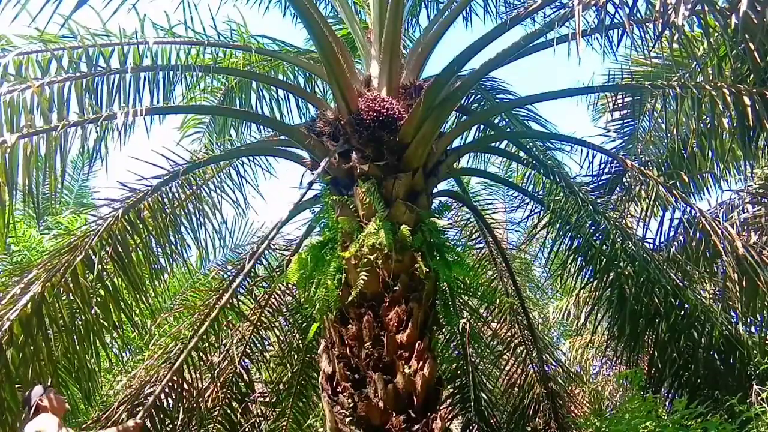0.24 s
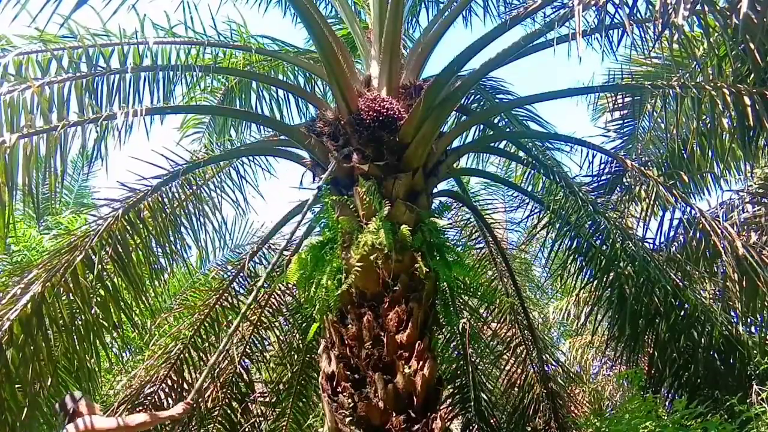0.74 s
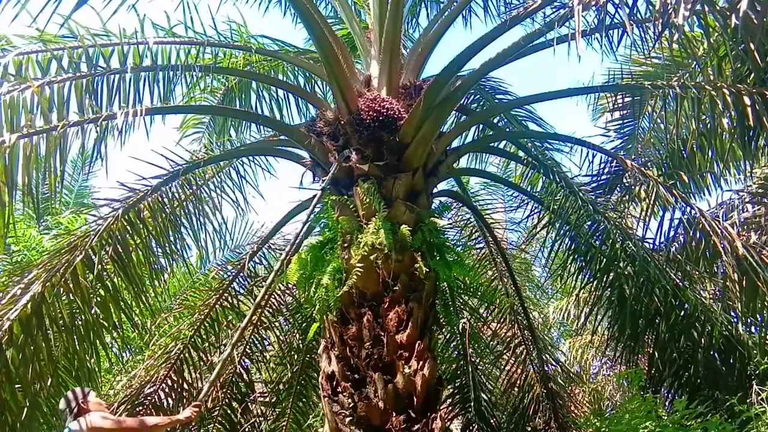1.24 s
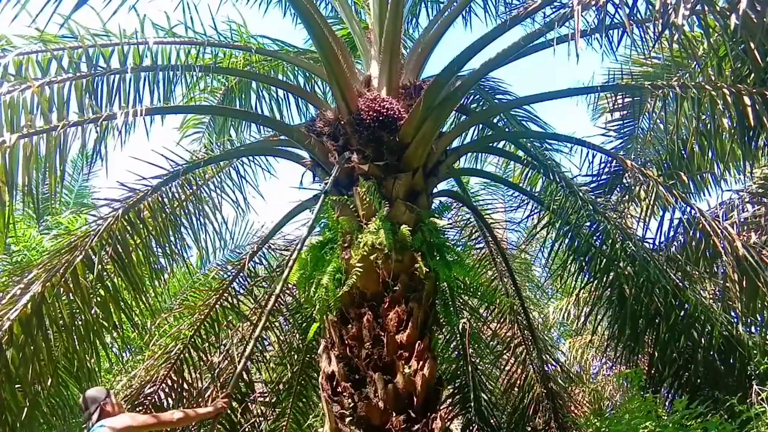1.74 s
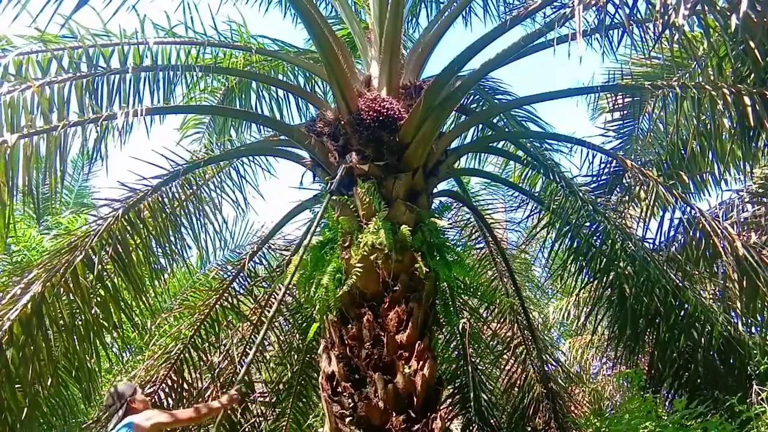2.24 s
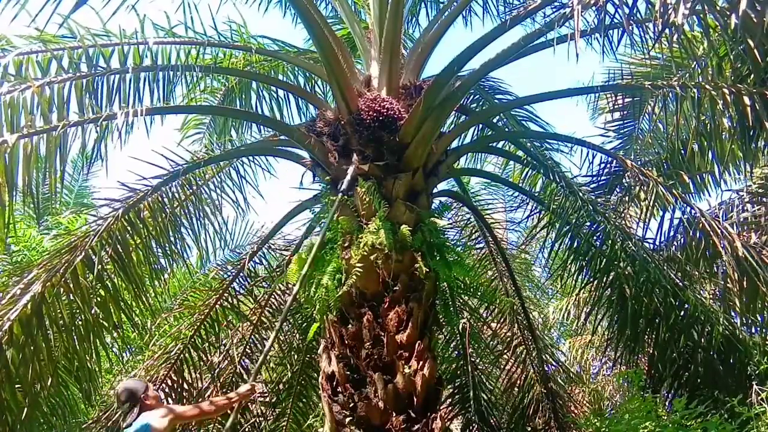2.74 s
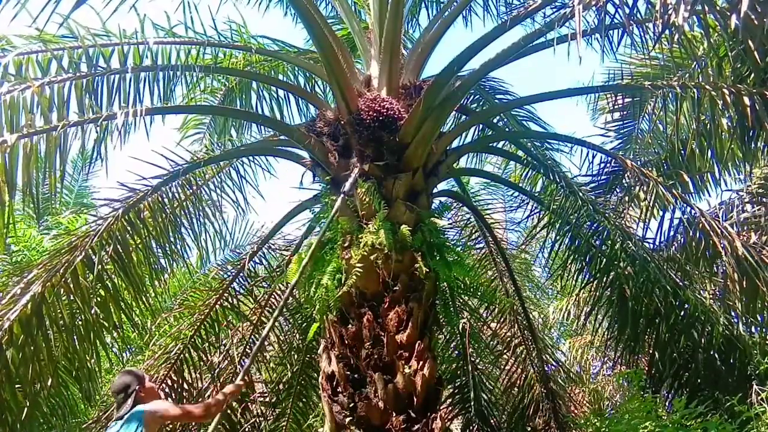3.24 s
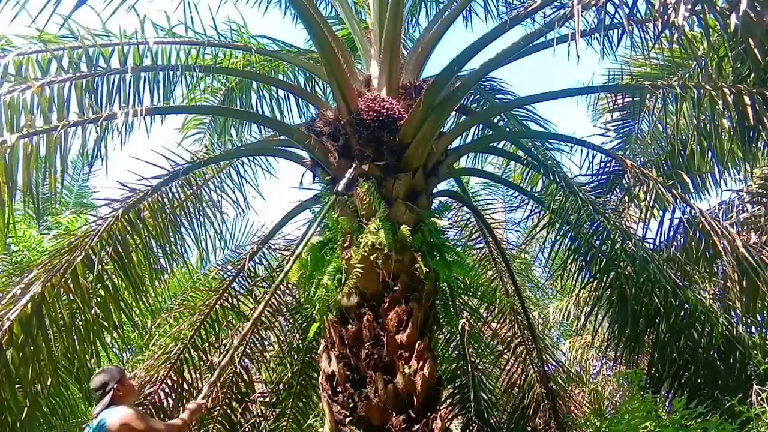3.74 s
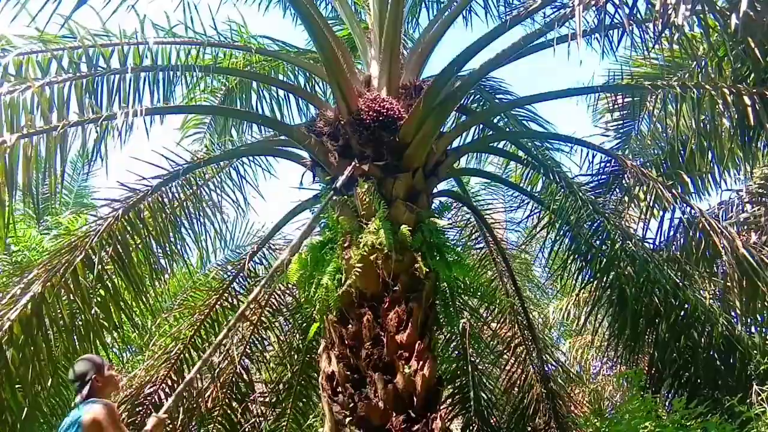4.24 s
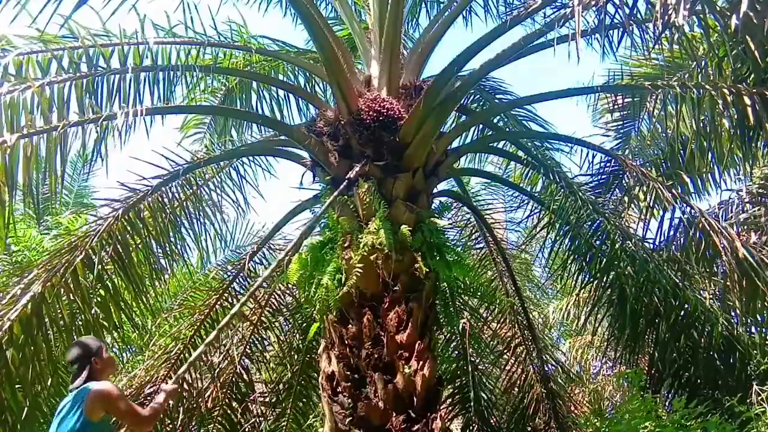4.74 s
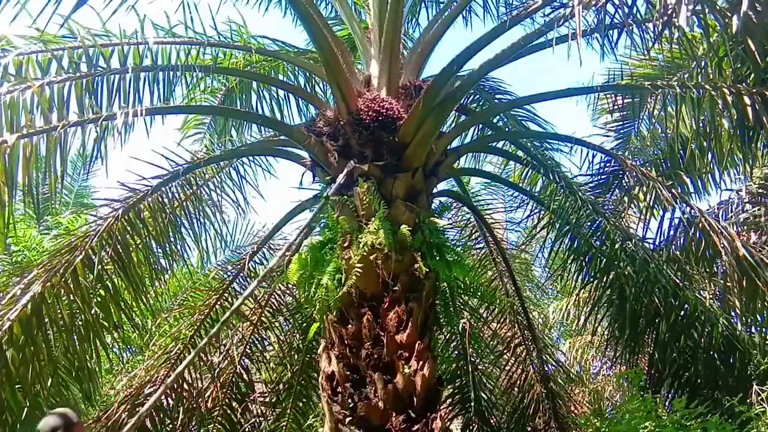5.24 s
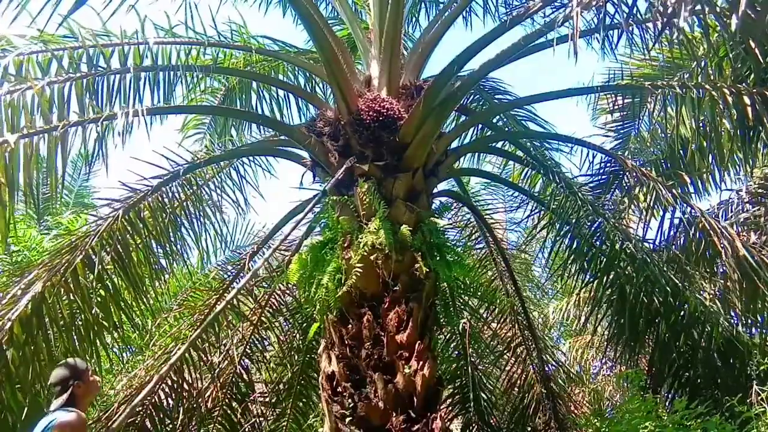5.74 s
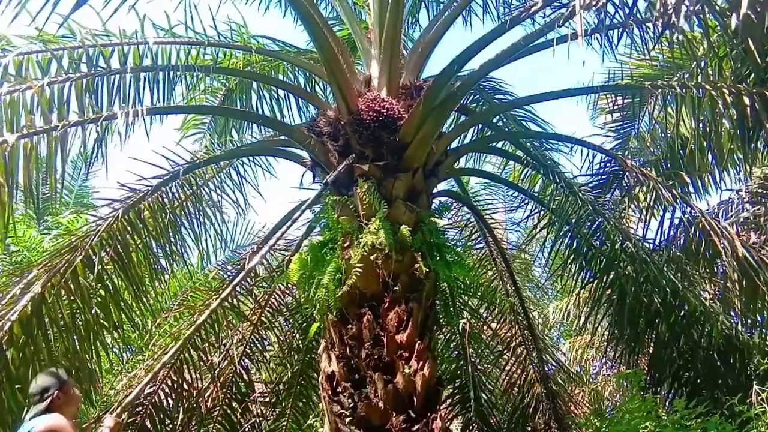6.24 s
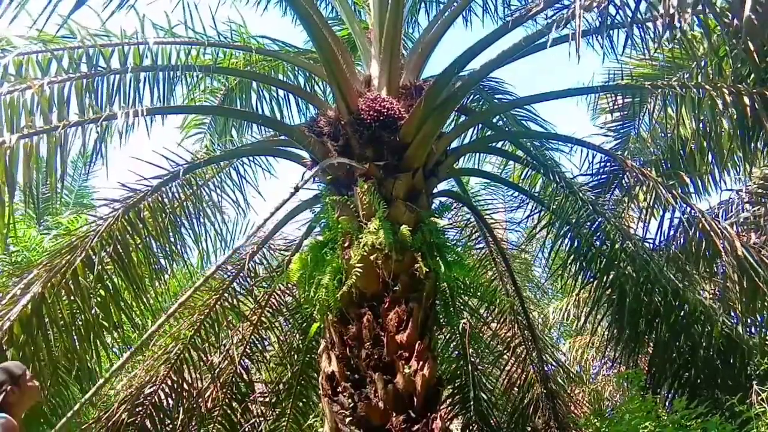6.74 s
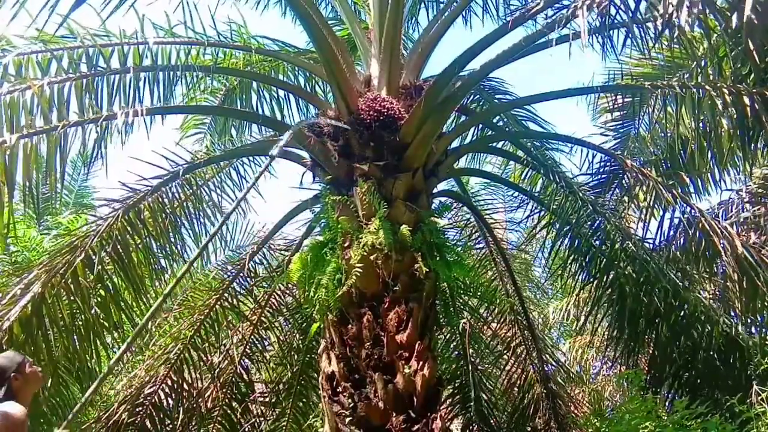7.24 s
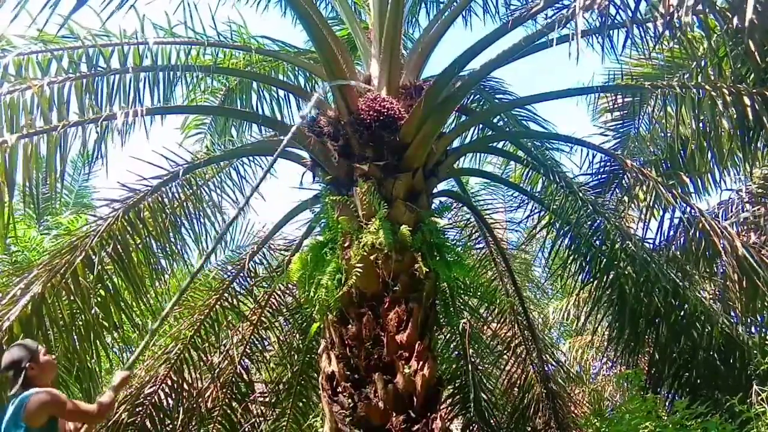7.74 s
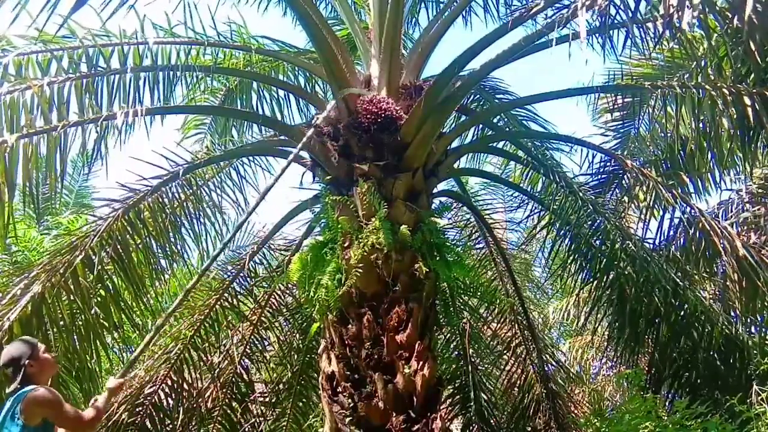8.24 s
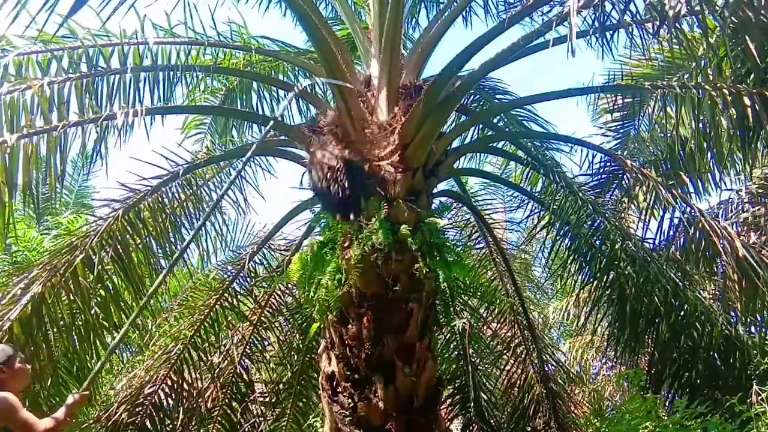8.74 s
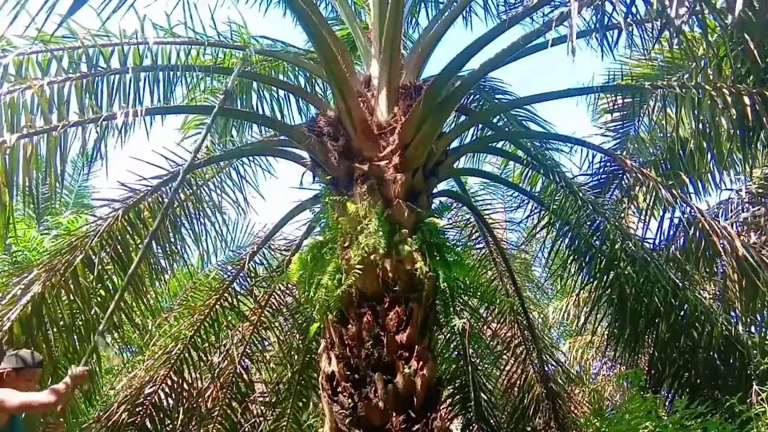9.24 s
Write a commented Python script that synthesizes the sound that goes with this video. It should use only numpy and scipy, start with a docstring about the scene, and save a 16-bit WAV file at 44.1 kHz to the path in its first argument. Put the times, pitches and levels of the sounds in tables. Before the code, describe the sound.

A blade on a long pole hacks into a palm crown with cracking blows, rustling fronds and cicada hiss, ending in a heavy low thud.

```python
"""Harvesting an oil palm with a sickle on a pole

A sickle on a long hollow pole is hooked into the crown and jerked again and again: blows are noise cracks,
blurred knocks and steel modes; rustle, scrape and creak are filtered grains; dull thumps are low swings.
A few thin tones squeal, and at the end the fruit bunch drops and thuds on the ground in short, damped swings.
Cicadas hiss in the plantation over a low bed of moving air. One microphone feeds both channels."""
import sys
import numpy as np
from scipy import signal
from scipy.fft import rfft, irfft, next_fast_len
from scipy.io import wavfile
from scipy.ndimage import uniform_filter1d, map_coordinates

SR = 44100
rng = np.random.default_rng(int(sys.argv[2]) if len(sys.argv) > 2 else 0)


def unload_wav(signal):
    """Save mono or channel-first audio to the path in sys.argv[1] as 16-bit WAV at rate SR, clipped to [-1, 1]."""
    wavfile.write(
        sys.argv[1],
        SR,
        np.round(np.clip(np.atleast_2d(signal).T, -1, 1) * 32767).astype(np.int16),
    )


N = 418051

# Colour of dry leaflets and of cracking fibre. Each row: frequency in Hz, relative level in dB per Hz.
LEAFLET_COLOUR = [(880, -21.5), (1500, -12), (1860, -15.5), (2930, -6.5), (3640, -5), (5840, -4),
                  (7930, 0.5), (10100, -8), (14900, -20), (15800, -5)]
# Modes of blade and pole. Each row: frequency in Hz, relative level in dB, time to fall 60 dB in seconds.
STEEL_MODES = [(2050, -6, 0.07), (2715, -7, 0.16), (3480, -10, 0.15), (4050, -5, 0.14), (4900, -9, 0.16),
               (5960, -7, 0.18), (6520, -6, 0.15), (7300, -3, 0.1), (7950, -2, 0.15)]
# Resonances of a scraped or knocked stalk. Each row: centre in Hz, width in Hz, relative level in dB.
STALK_WOOD = [(768, 376, -2.5), (1098, 306, 0.5), (1411, 372, -1), (1780, 260, -0.5), (2052, 297, -3.5),
              (2800, 220, -8.5)]
# The crown stirring between jerks. Each row: time in seconds, rustle level in dB, scrape level in dB.
CROWN_STIR = [(0, -36.5, -43), (.1, -31.5, -50), (.2, -35, -75), (.62, -39.5, -72), (.8, -44.5, -73),
              (.84, -38.5, -80), (1.3, -48.5, -57.5), (1.8, -48, -63), (2.45, -55, -52), (2.95, -75, -61),
              (3.4, -66, -64), (3.8, -51.5, -65), (4.7, -45.5, -67.5), (5.5, -46, -54), (6.1, -47.5, -57),
              (7.0, -43, -52.5), (7.5, -53, -59.5), (8.1, -33, -44), (8.9, -51, -61), (9.48, -27, -35)]


def amp(db):
    """Decibels to a linear factor."""
    return 10 ** (np.asarray(db) / 20)


def unit(x):
    """x brought to an RMS of 1."""
    return x / np.sqrt(np.mean(x ** 2) + 1e-20)


def along(points, hz):
    """Read a curve of (Hz, value) points on a log frequency axis."""
    f, v = np.transpose(points)
    return np.interp(np.log(hz + 1), np.log(f + 1), v)


def curves(rows):
    """One value per sample for each column after the time."""
    s, *cols = np.transpose(rows)
    return [np.interp(np.arange(N) / SR, s, c) for c in cols]


def wobble(rate):
    """A smooth random curve with rate knots a second."""
    knots = rng.standard_normal(int(N * rate / SR) + 4)
    return map_coordinates(knots, [np.arange(N) * rate / SR])


def filtered(x, response):
    """x shaped by a complex response of frequency."""
    m = next_fast_len(x.shape[-1] + SR // 4)
    spectrum = rfft(x, m) * response(np.fft.rfftfreq(m, 1 / SR))
    return irfft(spectrum, m)[..., :x.shape[-1]]


def coloured(x, points):
    """x shaped by a curve of (Hz, dB) points."""
    return filtered(x, lambda hz: amp(along(points, hz)))


def resonant(modes):
    """Causal response of (Hz, width in Hz, dB) resonances with alternating signs."""
    def response(f):
        return sum((-1) ** k * amp(db) * 1j * f * w / (c * c - f * f + 1j * f * w)
                   for k, (c, w, db) in enumerate(modes))
    return response


def grains(rate, spread_db, smooth):
    """Random tiny slips of uneven size, about rate a second, on a share of smooth noise."""
    size = amp(spread_db * np.minimum(rng.exponential(size=N), 3))
    slips = (rng.random(N) < rate / SR) * size * rng.standard_normal(N)
    return unit(slips) + smooth * rng.standard_normal(N)


def patchy(x, depth_db):
    """Random gain in small patches of time and pitch: each leaflet or fibre has its own brief colour."""
    z = signal.stft(x, nperseg=1024)[2]
    field = uniform_filter1d(rng.standard_normal(z.shape), size=3, axis=0)
    field = uniform_filter1d(field, size=5, axis=1)
    return unit(signal.istft(z * amp(depth_db * unit(field)), nperseg=1024)[1][:N])


def strokes(rows, rest_db):
    """Gain over time: every stroke swells, holds and fades above a resting level."""
    swing_db = 30  # the rise and fall times each span this much
    t = np.arange(0, N, 32) / SR
    power = np.zeros(len(t))
    for s, db, rise, hold, fall in rows:
        away = np.maximum(np.maximum((s - t) / rise, (t - s - hold) / fall), 0)
        power += amp(db - swing_db * away) ** 2
    return np.sqrt(amp(rest_db) ** 2 + np.interp(np.arange(N) / SR, t, power))


def cicadas():
    """Many far singers blur to a band of hiss; one near singer holds a thin wavering shrill above them."""
    # Level of the chorus. Each row: time in seconds, level in dB.
    chorus = [(0, -37), (1.7, -36.5), (2.6, -39.5), (2.9, -45.5), (4.2, -41.5), (5.4, -45.5), (7.4, -42),
              (8.8, -45), (9.48, -36)]
    # Colour of the far singers. Each row: frequency in Hz, relative level in dB per Hz.
    far_colour = [(6000, -40), (6350, -14), (6600, -4), (7100, 0), (7700, -2), (8000, -11), (8600, -18),
                  (9500, -36), (13000, -32), (14000, -22), (15500, -27)]
    far = unit(coloured(grains(2500, 1.2, smooth=2.5), far_colour))
    shrill_hz = 8295 + 28 * wobble(120)
    shrill = np.sin(2 * np.pi * np.cumsum(shrill_hz) / SR) * amp(2.2 * wobble(40))
    haze = unit(filtered(rng.standard_normal(N), resonant([(8310, 110, 0)])))
    near = unit(shrill + .8 * haze)
    return amp(curves(chorus)[0]) * (amp(.5 * wobble(60)) * far + amp(-6.5) * near)


def air():
    """Mostly low noise of moving air, its level wandering in gusts."""
    # Colour of the air. Each row: frequency in Hz, relative level in dB per Hz.
    air_colour = [(30, -26), (48, 1.5), (142, 7), (410, -7), (625, -0.5), (1300, -48), (1450, -11),
                  (6000, -24), (9000, -120)]
    gusts = amp(3 * wobble(15))
    return amp(-57.5) * gusts * unit(coloured(rng.standard_normal(N), air_colour))


def rustle():
    """Jerked leaflets crackle as many tiny slips and keep the steel singing through its modes."""
    # Leaflets shaken by a jerk. Each row: start of the peak in seconds, level in dB,
    # then rise, hold and fall in seconds.
    shakes = [(.394, -35.5, 0.075, 0.0087, 0.24), (1.107, -31.5, 0.28, 0.013, 0.3),
              (1.836, -23.5, 0.012, .005, 0.23), (2.19, -29.5, 0.014, 0.028, 0.37),
              (2.23, -24.5, 0.021, 0.064, 0.031), (2.554, -18.5, 0.056, .005, 0.28),
              (3.143, -16.5, 0.071, 0.0029, 0.36), (4.09, -42.5, 0.074, 0.041, 0.092),
              (4.3, -33, 0.044, .005, 0.063), (4.385, -24.5, 0.027, 0.035, .1),
              (4.425, -19, 0.082, 0.028, 0.25), (5.07, -20.5, 0.07, 0.065, 0.33),
              (5.235, -29.5, .03, 0.051, 0.14), (5.692, -16.5, 0.098, 0.0046, 0.25),
              (6.201, -17, 0.031, 0.13, 0.16), (6.62, -35, 0.69, 0.0065, 0.37),
              (7.64, -25, 0.053, 0.027, 0.089), (7.815, -20.5, 0.026, 0.016, 0.059),
              (7.962, -32.5, 0.97, 0.035, 0.14), (8.281, -18, 0.024, .005, 0.34),
              (8.68, -37.5, 0.049, .005, 0.23), (8.98, -20.5, 0.027, 0.004, 0.19),
              (9.114, -14, 0.054, 0.0029, 0.22), (9.399, -19, 0.1, 0.0049, 0.078)]
    # A fine treble hiss as the pole is steered in. Each row: time in seconds, level in dB.
    tip_levels = [(0, -46), (.4, -38.5), (.75, -55), (1.1, -34), (1.25, -46), (1.42, -33.5), (1.6, -58)]
    shaking = strokes(shakes, curves(CROWN_STIR)[0])
    leaflets = patchy(coloured(grains(3500, 2.5, smooth=1.0), LEAFLET_COLOUR), depth_db=2.4)
    steel = resonant([(hz, 70, db) for hz, db, _ in STEEL_MODES])
    singing = unit(filtered(leaflets, steel))
    tips = unit(filtered(grains(3700, 1.5, smooth=0.93), resonant([(10700, 19000, 0)])))
    moving = shaking * (leaflets + amp(-8.5) * singing) + amp(curves(tip_levels)[0]) * tips
    return amp(1.2 * wobble(30)) * moving


def drag_gain():
    """How strongly the edge drags across fibre at each moment."""
    # Drags of the edge. Each row: start of the peak in seconds, level in dB,
    # then rise, hold and fall in seconds.
    drags = [(.085, -37.5, 0.043, 0.026, 0.05), (.135, -43.5, .03, 0.053, 0.027),
             (.394, -43, 0.075, .01, 0.61), (.89, -44, 0.13, 0.053, 0.098),
             (1.861, -24.5, 0.07, 0.0041, 0.084), (2.195, -35.5, 0.03, .02, 0.11),
             (2.23, -24, 0.046, 0.026, 0.12), (2.505, -30, 0.013, 0.048, 0.22),
             (2.724, -30, 0.045, 0.0037, 0.053), (3.093, -34, 0.016, 0.038, 0.058),
             (3.135, -31.5, 0.075, 0.011, 0.2), (4.388, -23, 0.034, 0.014, 0.19),
             (5.034, -27, 0.02, 0.0032, 0.053), (5.12, -31, 0.17, 0.081, 0.063),
             (5.235, -27, 0.017, 0.042, 0.11), (5.652, -23.5, 0.047, 0.0039, 0.2),
             (6.201, -27.5, 0.075, 0.0058, 0.61), (6.3, -29.5, 0.15, 0.0099, 0.1),
             (6.59, -31.5, 0.056, 0.012, 0.22), (7.603, -29.5, 0.047, 0.062, 0.1),
             (7.752, -33, 0.032, 0.017, 0.034), (7.79, -37.5, 0.023, 0.028, 0.064),
             (7.91, -34, 0.011, 0.069, 0.026), (8.155, -39.5, 0.39, .05, .05),
             (8.235, -33, 0.023, 0.072, 0.3), (8.98, -25.5, 0.028, 0.0032, 0.1),
             (9.108, -21, 0.06, 0.0067, 0.13), (9.399, -28.5, 0.063, 0.0043, 0.073)]
    return strokes(drags, curves(CROWN_STIR)[1])


def scraping(dragging):
    """The edge slips over fibres, and the stalk's resonances, applied twice, colour the slips."""
    slips = grains(700, 1.6, smooth=0.94)
    scrape = patchy(filtered(slips, lambda hz: resonant(STALK_WOOD)(hz) ** 2), depth_db=3.2)
    return amp(1.2 * wobble(60)) * dragging * scrape


def creaking(dragging):
    """Loaded stalks grumble: sparse slips shake low resonances, more so while the edge drags."""
    # Stalks under load. Each row: time in seconds, level in dB.
    creak_levels = [(0.0, -47), (1.74, -56.5), (2.56, -47), (2.85, -64), (9.08, -77), (9.48, -41)]
    # Resonances of a bent stalk. Each row: centre in Hz, width in Hz, relative level in dB.
    bent_stalk = [(219.6, 36, 1), (327, 162, 4), (118, 48, -1), (484, 370, -9.5)]
    creak = unit(filtered(grains(200, 0.94, smooth=1.0), resonant(bent_stalk)))
    load = amp(curves(creak_levels)[0]) + amp(-6.0) * dragging
    return amp(1.2 * wobble(20)) * load * creak


def squeal(rows):
    """A thin, unsteady stick-slip tone."""
    hz, db = curves(rows)
    t = np.arange(N) / SR
    on = np.clip(np.minimum(t - rows[0][0], rows[-1][0] - t) / 0.0018, 0, 1)
    unsteady_hz = hz * (1 + 0.014 * wobble(180))
    return on * amp(db + 3 * wobble(70)) * np.sin(2 * np.pi * np.cumsum(unsteady_hz) / SR)


def squeals():
    """All the thin whistles, perhaps fronds squealing along the blade."""
    # One list per whistle. Each row: time in seconds, frequency in Hz, level in dB.
    whistles = [
        [(0.0, 2380, -33), (0.08, 2450, -48)],
        [(0.25, 1710, -50), (0.38, 1450, -57)],
        [(0.39, 1664, -50), (0.47, 1970, -36), (0.53, 1890, -56)],
        [(2.585, 2010, -49), (2.63, 2010, -38), (2.69, 1980, -47)],
        [(7.62, 2530, -34.5), (7.82, 2480, -49)],
        [(1.33, 3262, -53), (1.474, 3280, -48), (1.55, 3250, -60)],
    ]
    return sum(map(squeal, whistles))


def pole(x):
    """The bright part runs down the hollow pole and comes back every 16 ms, weaker each trip."""
    def response(f):
        returned = .45 / (1 + (1500 / (f + 1)) ** 6)
        round_trip = returned * np.exp(-2j * np.pi * f * .016)
        return 1j * f / (150 + 1j * f) / (1 - round_trip)
    return filtered(x, response)


def blade():
    """Every blow cracks fibres, rings the steel at new strengths and knocks the stalk at its own pitch."""
    # Bites and knocks. Each row: start in seconds, crack level in dB, relative knock level in dB,
    # knock pitch in Hz.
    blows = [(0.0835, -33, -23.5, 1330), (0.3858, -26.5, -23.5, 1745), (0.518, -52, -25.5, 880),
             (0.5422, -28.5, -30, 1590), (0.567, -50, -18.5, 953), (0.8851, -43, -19, 1420),
             (0.935, -45, -30, 2180), (0.947, -21.5, -38, 1290), (1.835, -24, -20, 817),
             (1.8539, -8, -17.5, 1040), (1.953, -47, -31.5, 1410), (2.14, -33, -52, 1420),
             (2.184, -22.5, -25.5, 1360), (2.3695, -27.5, -21.5, 813), (2.41, -52, -30, 1450),
             (2.475, -34, -25, 844), (2.5465, -6.5, -8, 1467), (2.6758, -24, -19.5, 753),
             (2.7043, -20.5, -18.5, 1620), (2.7197, -25.5, -24, 1770), (2.84, -40, -33.5, 1290),
             (3.0842, -25.5, -20.5, 1436), (3.1384, -6, -14, 880), (4.28, -36, -46, 1800),
             (4.377, -38, -25, 1520), (4.4182, -4.5, -10.5, 816), (4.502, -19, -22.5, 1475),
             (4.6508, -30, -28.5, 1390), (4.999, -30, -24.5, 1465), (5.026, -21, -14.5, 1825),
             (5.0427, -8, -18.5, 808), (5.2327, -23, -27, 554), (5.608, -32, -24, 1470),
             (5.681, -7.5, -8.5, 1437), (6.108, -35, -31.5, 2180), (6.185, -21, -19, 1176),
             (6.199, -10, -11.5, 1495), (6.631, -25.5, -20.5, 1296), (6.8328, -26.5, -25, 2000),
             (6.922, -33, -26, 1984), (6.9542, -36, -32, 1930), (7.0334, -37, -27.5, 1985),
             (7.109, -47, -36, 2010), (7.218, -37, -28, 1950), (7.243, -42, -35, 1935),
             (7.419, -32, -29.5, 1790), (7.5546, -26, -26, 1870), (7.5946, -13, -12.5, 1310),
             (7.8114, -20, -23, 1070), (8.2332, -26.5, -36, 1110), (8.2684, -6, -3, 1602),
             (8.672, -24, -35, 1820), (8.969, -18, -27, 1194), (9.0431, -24, -17, 820),
             (9.1068, -13, -8.5, 547)]
    clink_hz = 1930  # knocks from this pitch up are clinks of the pole: purer, with a fixed decay
    out, knocks, t = np.zeros(N + SR), np.zeros(N + SR), np.arange(SR // 2) / SR
    dying = amp(-60 * t / 0.1) * (1 - np.exp(-t / 0.0011))  # 60 dB down in 0.1 s, after a short onset
    for s, crack_db, knock_db, hz in blows:
        puff = rng.standard_normal((4, len(t)))
        crack = unit(coloured(puff[0], LEAFLET_COLOUR)) * (0.73 * dying + 0.83 * dying ** 4)

        shiver = np.cumsum(puff[2]) * 0.075  # radians; the blade rubs on fibre, so its tones are blurred
        ring = np.zeros(len(t))
        for f, level, life in STEEL_MODES:
            strength = amp(level + rng.normal(0, 4.4) - 60 * t / life)
            ring += strength * np.sin(2 * np.pi * f * rng.normal(1, 0.0089) * t + shiver)
        ring_db = -17.5 + 0.74 * crack_db  # the ring grows more slowly than the crack

        if hz < clink_hz:
            body, shortness = 0.57, 1.22 + hz / 1700  # higher knocks are shorter
        else:
            body, shortness = 0.25, 1.7
        tone = np.sin(2 * np.pi * hz * t + 0.097 * np.cumsum(puff[3]))  # its phase wanders
        whole_stalk = unit(filtered(puff[1], resonant(STALK_WOOD)))
        knock = (tone + body * whole_stalk) * amp(1) * dying ** shortness

        start = round(s * SR)
        out[start:][:len(t)] += amp(crack_db) * crack
        knocks[start:][:len(t)] += amp(knock_db) * knock + amp(ring_db) * ring
    return (out + pole(knocks))[:N]


def trees(x):
    """Trunks and fronds scatter a short diffuse tail."""
    t = np.arange(SR // 2) / SR
    tail = rng.standard_normal(len(t)) * amp(-60 * t / 0.66) * (1 - np.exp(-t / 0.011))
    return signal.fftconvolve(x, tail / np.linalg.norm(tail))[:N]


def thumps():
    """Soft heavy contacts: a low, unsteady swing with a dull puff under it swells, then is damped quickly."""
    # Jolted stalks and the bunch on the soil. Each row: start in seconds, level of the swing in dB,
    # pitch in Hz.
    jolts = [(0.564, -25.5, 454), (0.714, -38, 280), (0.952, -32, 320), (1.334, -37.5, 397),
             (1.846, -22.5, 254), (2.239, -23, 297), (2.27, -19, 323), (2.376, -19.5, 258),
             (2.479, -31, 354), (2.591, -29.5, 236), (2.679, -22.5, 343), (2.687, -27.5, 101),
             (4.496, -30, 269), (4.651, -34.5, 345), (5.105, -26.5, 268), (5.182, -24, 324),
             (5.235, -21, 309), (5.285, -15.5, 340), (5.602, -19.5, 318), (5.685, -26.5, 344),
             (5.857, -29.5, 248), (6.23, -16.5, 353), (6.254, -21.5, 350), (6.32, -27.5, 370),
             (6.643, -28, 357), (6.894, -40, 255), (7.189, -43, 199), (7.595, -17.5, 294),
             (7.609, -30, 147), (8.078, -32.5, 290), (8.154, -31, 296), (8.195, -30.5, 678),
             (8.201, -30, 294), (8.314, -32, 360), (8.48, -37.5, 329), (8.972, -30, 258), (9.086, -23, 184),
             (9.134, -22, 104), (9.16, -21.5, 58)]
    rise = 0.013  # seconds of swell
    out, t = np.zeros(N + SR), np.arange(SR // 4) / SR
    swell = t / rise * np.exp(.5 - .5 * (t / rise) ** 2)
    for s, db, hz in jolts:
        chance = rng.standard_normal((2, len(t)))
        swing = np.sin(2 * np.pi * hz * t + 0.048 * np.cumsum(chance[0]))
        dull = resonant([(.75 * hz, .6 * hz, 0)])
        puff = unit(filtered(chance[1], lambda f: dull(f) ** 2))
        out[round(s * SR):][:len(t)] += amp(db) * swell * (swing + 0.34 * puff)
    return out[:N]


def bunch():
    """A heavy soft body hardly rings: each contact is one strong push and a weak swing back."""
    # The bunch striking the trunk, the soil, and the soil again. Each row: start in seconds,
    # starting level in dB, pitch in Hz, cycles until 20 dB down.
    contacts = [(9.044, -3, 730, 2.5), (9.1106, 2, 104, 1.1), (9.238, -6, 234, 0.35)]
    out, t = np.zeros(N + SR), np.arange(SR // 4) / SR
    for s, db, hz, cycles in contacts:
        push = amp(db - 20 * t * hz / cycles) * np.sin(2 * np.pi * hz * t)
        out[round(s * SR):][:len(t)] += push
    return out[:N]


def scene():
    """Crown, tool and plantation together, the same in both channels; only the blows get a tail."""
    dragging = drag_gain()
    crown = rustle() + scraping(dragging) + creaking(dragging)
    hits = blade()
    tool = hits + amp(-22.0) * trees(hits) + squeals()
    mono = cicadas() + air() + crown + tool + thumps() + bunch()
    return np.array([mono, mono])


def record(dry):
    """The microphone drops the deepest bass, the loudest peaks flatten at full scale, the band ends steeply."""
    wet = filtered(dry, lambda hz: (-hz ** 2 / (48 ** 2 - hz ** 2 + 1j * 60 * hz)) ** 3)
    flattened = wet / (1 + np.abs(wet) ** 8) ** (1 / 8)
    return filtered(flattened, lambda hz: hz < 15700)


dry = scene()
out = record(dry)
unload_wav(out)
```